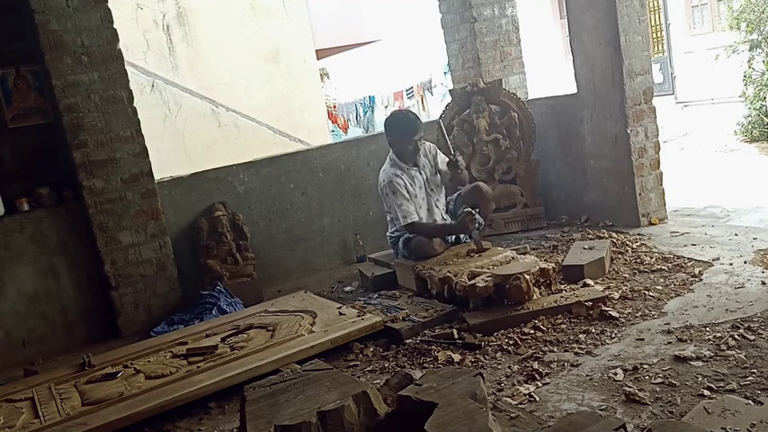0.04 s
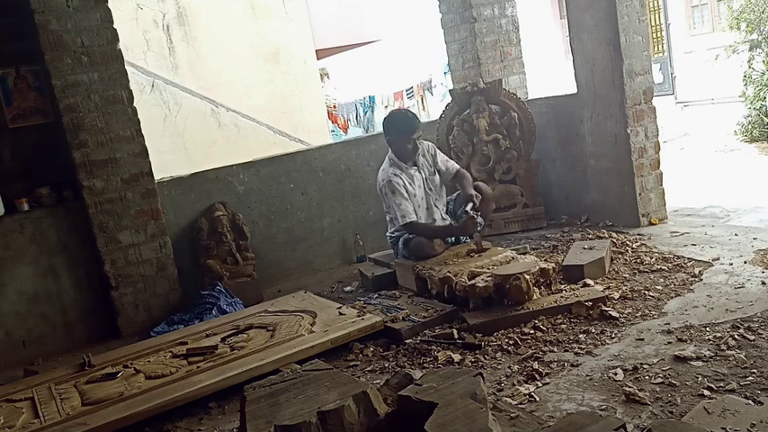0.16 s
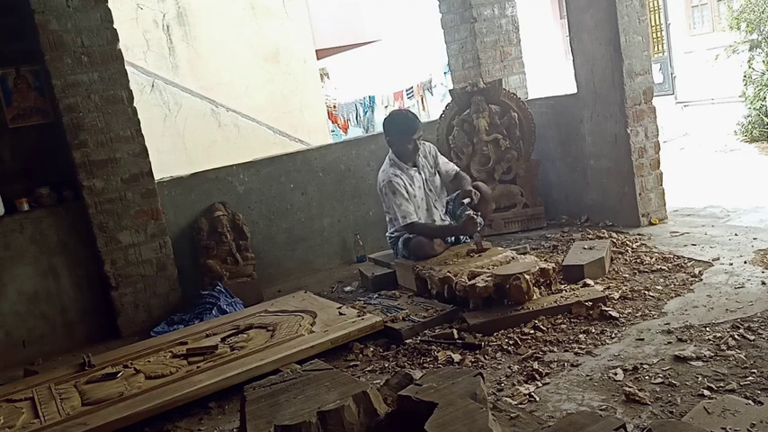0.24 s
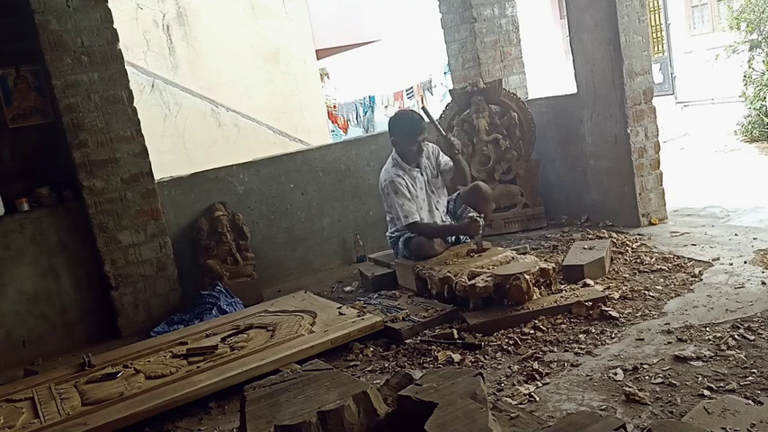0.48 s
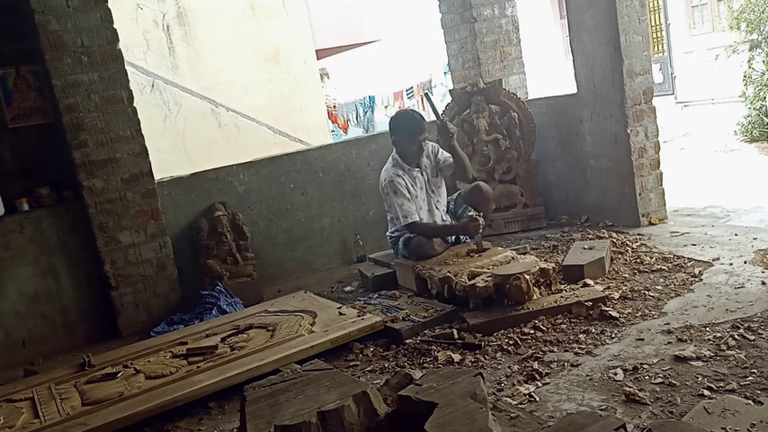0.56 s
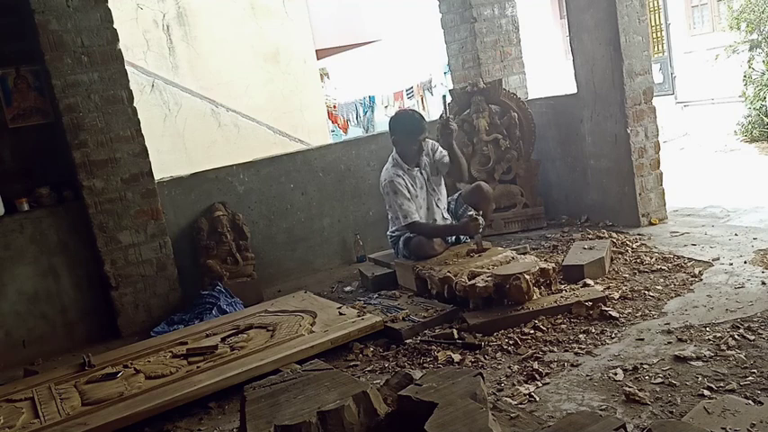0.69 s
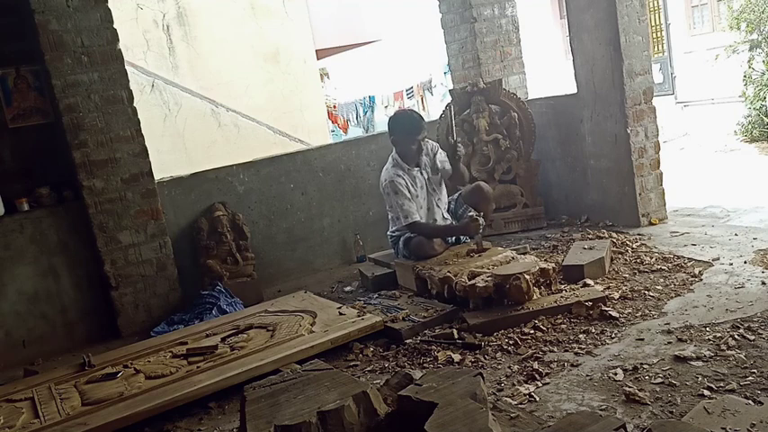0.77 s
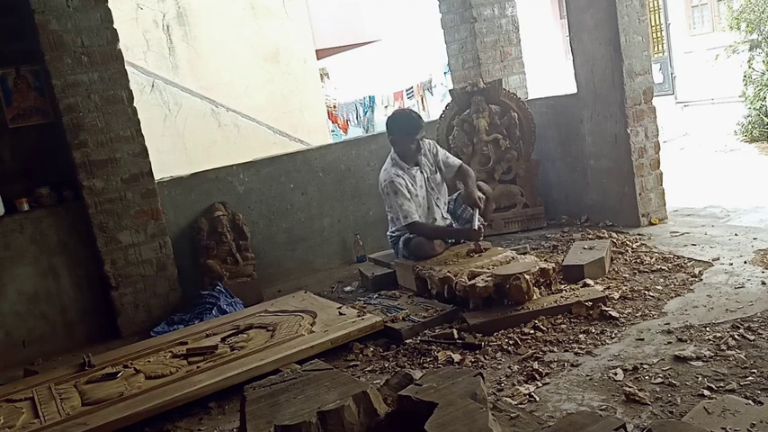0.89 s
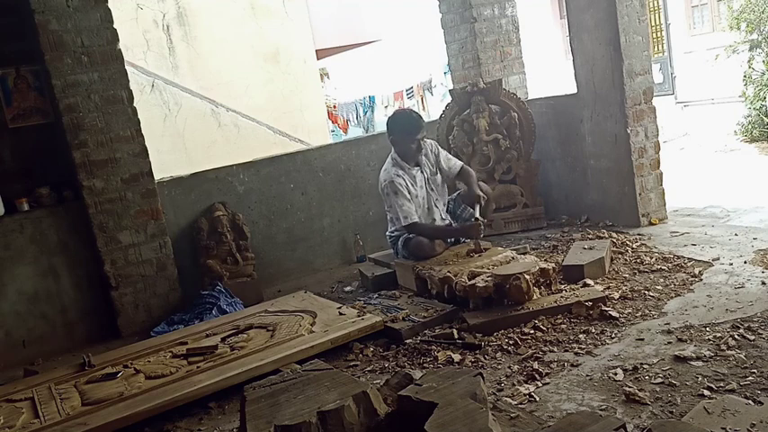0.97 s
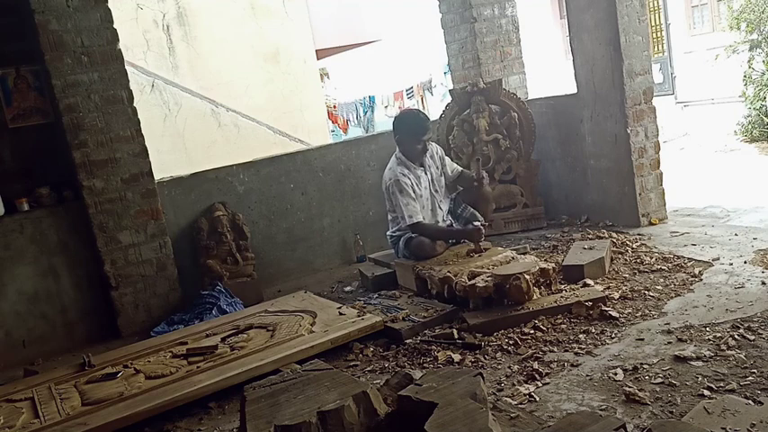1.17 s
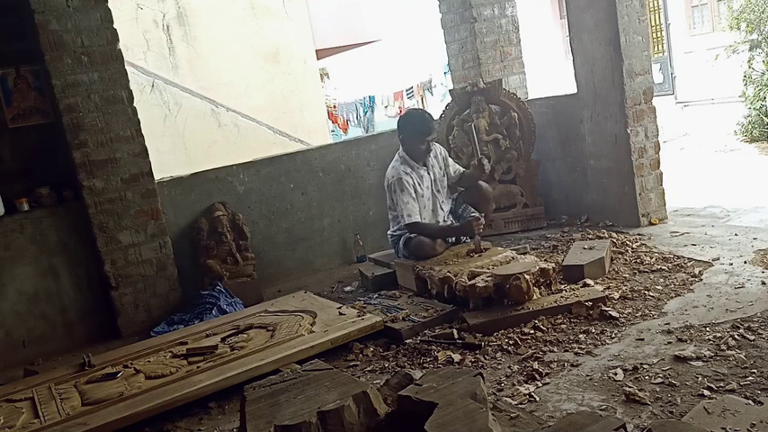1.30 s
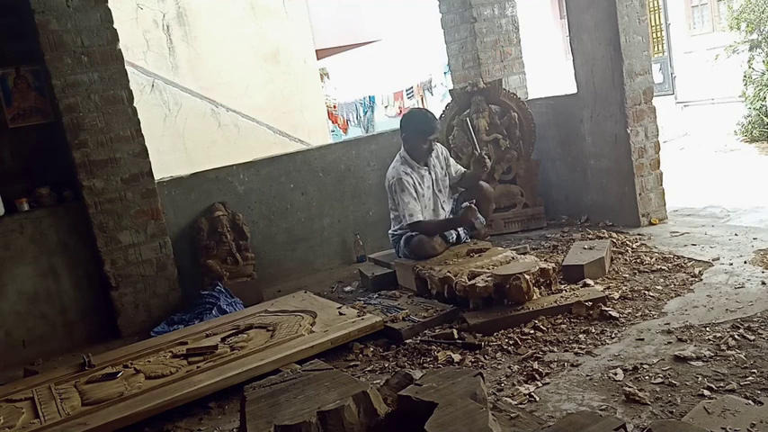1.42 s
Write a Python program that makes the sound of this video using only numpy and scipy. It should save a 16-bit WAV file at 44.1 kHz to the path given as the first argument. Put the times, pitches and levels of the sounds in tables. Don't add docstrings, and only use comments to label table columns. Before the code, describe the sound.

A mallet knocks a steel chisel into a thick wooden slab: a dull tap, then a fuller one, then one hard ringing blow. Open brick shed, heard from some metres away, with faint machine drone and street hiss.

```python
import sys
import numpy as np
from scipy import signal
from scipy.fft import rfft, irfft, next_fast_len
from scipy.io import wavfile
from scipy.ndimage import uniform_filter1d, map_coordinates

SR = 44100
rng = np.random.default_rng(int(sys.argv[2]) if len(sys.argv) > 2 else 0)


def magnitude_from_level(level_db):
    exponent = np.asarray(level_db, float) / 20
    return 10 ** exponent


def dump_mix(stems):
    frames = np.atleast_2d(stems).T
    limited = np.clip(frames, -1, 1)
    pcm = np.round(limited * 32767).astype(np.int16)
    wavfile.write(sys.argv[1], SR, pcm)


N = 63945

BLOW_LAG_S, TAP_LAG_S, STREET_LAG_S = .0001, -.00043, -.000363
RING_DIRECT_DB = 8


def unit(x):
    return x / np.sqrt(np.mean(x ** 2) + 1e-20)


def energy1(x):
    return x / np.linalg.norm(x)


def along(points, hz):
    f, v = np.transpose(points)
    return np.interp(np.log(hz + 1), np.log(f + 1), v)


def curve(rows):
    return np.interp(np.arange(N) / SR, *np.transpose(rows))


def wobble(rate):
    return map_coordinates(rng.standard_normal(200), [np.arange(N) * rate / SR])


def filtered(x, response):
    n = x.shape[-1]
    m = next_fast_len(n + SR // 4)
    return irfft(rfft(x, m) * response(np.fft.rfftfreq(m, 1 / SR)), m)[..., :n]


def causal(points, size=4096):
    level_db = np.maximum(along(points, np.fft.rfftfreq(size, 1 / SR)), -70)
    cepstrum = irfft(np.log(magnitude_from_level(level_db)), size)
    cepstrum[1:size // 2] *= 2
    cepstrum[size // 2 + 1:] = 0
    return irfft(np.exp(rfft(cepstrum)), size)


def ports(pair):
    # (frequency [Hz], left-right likeness [0-1])
    alike = [(130, 1), (240, .96), (600, .7), (1500, .4), (4000, .3), (15000, .2)]

    def mid_side(hz):
        turn = np.arccos(np.clip(along(alike, hz), -1, 1)) / 2
        return np.array([np.cos(turn), np.sin(turn)])

    mid, side = filtered(pair, mid_side)
    return np.array([mid + side, mid - side])


def placed(pair, s, lag_s, left_db=.7):
    port_s = s + lag_s * np.array([[.5], [-.5]])
    gain = magnitude_from_level(left_db * np.array([[1], [-1]]))
    return gain * filtered(pair, lambda hz: np.exp(-2j * np.pi * hz * port_s))


def rush(spectrum, patchy_db):
    z = signal.stft(rng.standard_normal((2, N)), nperseg=512)[2]
    patches = uniform_filter1d(rng.standard_normal(z.shape[1:]), 4, 0)
    patches = unit(uniform_filter1d(patches, 8, 1))
    pair = signal.istft(z * magnitude_from_level(patchy_db * patches), nperseg=512)[1][:, :N]
    return unit(filtered(ports(pair), lambda hz: magnitude_from_level(along(spectrum, hz))))


def machine():
    # (time [s], level [dB])
    load = [(0, -56.5), (.35, -58.5), (.6, -57), (.8, -58.5), (1.0, -58.5), (1.07, -64), (1.14, -58),
            (1.22, -55.5), (1.3, -55.5), (1.35, -59.5), (1.4, -59), (1.45, -57)]
    # (frequency [Hz], level [dB per Hz])
    drone = [(65, -48), (110, -21.5), (404, -5.5), (529, -7.5), (578, -5.5), (1200, -32), (1560, -64),
             (2640, -120)]
    # (frequency [Hz], rms level among the tones [dB], width [Hz])
    motor = [(377.5, -19.5, 6.7), (424.5, -13, 11), (599.5, -9, 14.6), (780, -16.5, 28), (882, -10, 26),
             (1247, -22, 4), (1963, -17, 18), (2510, -16.5, 23)]

    def lines(hz):
        return sum(magnitude_from_level(db) / np.sqrt(width) / (1 + ((hz - centre) / width) ** 2)
                   for centre, db, width in motor)

    tones = magnitude_from_level(2) * unit(filtered(ports(rng.standard_normal((2, N))), lines))
    body = magnitude_from_level(wobble(10.47)) * rush(drone, patchy_db=4.5)
    return placed(magnitude_from_level(curve(load)) * (body + tones), 0, STREET_LAG_S)


def street():
    # (time [s], level [dB])
    swell = [
        (0, -55.5),
        (.6, -57),
        (.85, -53.5),
        (1.05, -56),
        (1.45, -56),
    ]
    # (frequency [Hz], level [dB per Hz])
    hiss = [(600, -16), (950, -9), (1340, -8), (1980, -3), (2500, -4), (3100, -14), (5700, -16.5),
            (7000, -25.5)]
    level = magnitude_from_level(curve(swell) + .8 * wobble(15))
    return placed(level * rush(hiss, patchy_db=1), 0, STREET_LAG_S)


def wind():
    # (time [s], level [dB])
    gusts = [(0, -52.5), (.1, -65.5), (.2, -70.5), (.3, -61), (.4, -68), (.55, -49.5), (.62, -61),
             (.7, -61.5), (.78, -58), (1.0, -70), (1.45, -67.5)]
    # (frequency [Hz], level [dB per Hz])
    rumble = [(25, -45), (36, -20), (50, 0), (64, -8), (82, -3), (105, -10), (140, -32)]
    return magnitude_from_level(curve(gusts)) * rush(rumble, patchy_db=0)


def crack(tone):
    return energy1(causal(tone))


def ring(modes, rise_cycles=4.5):
    t = np.arange(SR // 2) / SR
    total = 0
    for k, (hz, db, t60) in enumerate(modes):
        swing = (1 - np.exp(-t * hz / rise_cycles)) * np.sin(2 * np.pi * hz * t)
        total = total + (-1) ** k * magnitude_from_level(db - 60 * t / t60) * swing
    return energy1(total)


def heard(x, db, rise_s, direct_db=-20):
    # (frequency [Hz], t60 [s])
    shed = [(100, 0.22), (300, 0.35), (1000, 0.32), (3000, 0.31), (5000, 0.25), (7000, 0.24), (14000, 0.13)]
    hz, t, z = signal.stft(rng.standard_normal((2, SR)), SR, nperseg=256)
    decay = magnitude_from_level(-60 * t / along(shed, hz)[:, None])
    tail = ports(signal.istft(z * decay, SR, nperseg=256)[1][:, :SR])
    tail = tail * (1 - np.exp(-np.arange(SR) / SR / abs(rise_s)))
    tail = tail / np.linalg.norm(tail[0])
    tail[:, :1] += magnitude_from_level(direct_db)
    wet = signal.fftconvolve(x[None], tail, axes=1)
    return magnitude_from_level(db + 30) * np.pad(wet, ((0, 0), (0, N)))[:, :N]


def taps():
    # (time [s], level [dB], wall rise [s], slab ring over the crack [dB])
    knocks = [
        (-.02, -39, 0.0076, -19),
        (0.2076, -37.5, 0.0071, -1),
    ]
    # (frequency [Hz], level [dB per Hz])
    tone = [(130, -43), (220, -3), (450, -7), (1000, 0), (2000, -7), (2700, -16), (3300, -30),
            (6000, -34.5)]
    # (frequency [Hz], level [dB], t60 [s])
    slab_low = [(242, 0, .17), (297, -3, .14), (406, -1, .13), (900, -7, .13), (1130, -9, .09),
                (1310, -9, .12)]
    out = 0
    for s, db, rise_s, slab_db in knocks:
        slab = heard(ring(slab_low), db + slab_db - RING_DIRECT_DB, rise_s, RING_DIRECT_DB)
        out = out + placed(heard(crack(tone), db, rise_s) + slab, s, TAP_LAG_S)
    return out


def blow():
    # (frequency [Hz], level [dB per Hz])
    tone = [(130, -27.5), (230, -2), (650, -8), (1450, -4), (3000, -0.5), (4200, -5), (5500, 1.5),
            (7000, -12.5)]
    # (frequency [Hz], level [dB], t60 [s])
    slab = [(246, 0, .16), (322, -1, .14), (405, -3, .12), (537, -5, .14), (795, -2, .1), (1150, -6, .09),
            (1388, -2, .13), (1505, -4, .11), (1765, -8, .13), (2196, -4, .16), (2585, -6, .12),
            (2715, -7, .12)]
    # (frequency [Hz], level [dB], t60 [s])
    blade = [(4956, -9, .12), (5100, -7, .16), (5350, -10, .18), (5720, -4, .09), (6234, -10, .1),
             (8107, -11, .1)]
    # (frequency [Hz], level [dB], t60 [s])
    long_note = [(3681, 0, .27), (3706, -3, .24), (3780, -7, .08), (3674.8, -7, .42)]
    # (frequency [Hz], level [dB], t60 [s])
    floor = [(52, -56, .5), (82, -48, .25)]
    db, rise_s = -20.5, .0035
    slab_db, note_db, note_direct_db = -4, -24, 14
    thud_rise_s = .021

    hit = heard(crack(tone), db, rise_s)
    body = heard(ring(slab + blade), db + slab_db - RING_DIRECT_DB, rise_s, RING_DIRECT_DB)
    note = heard(ring(long_note, rise_cycles=10), note_db - note_direct_db, rise_s, note_direct_db)
    t = np.arange(N) / SR
    thud = sum(magnitude_from_level(mode_db - 60 * t / t60) * np.sin(2 * np.pi * hz * t) for hz, mode_db, t60 in floor)
    thud = (1 - np.exp(-t / thud_rise_s)) * thud
    return placed(hit + body + note + thud, .3902, BLOW_LAG_S, left_db=-.2)


def chip():
    # (frequency [Hz], level [dB per Hz])
    tone = [(2500, -30), (4000, 0), (7000, -2), (15000, 2)]
    return placed(heard(crack(tone), db=-53, rise_s=.001), 1.043, BLOW_LAG_S)


def scene():
    return machine() + street() + wind() + taps() + blow() + chip()


def roll_off(x):
    return signal.sosfilt(signal.butter(12, 16710, fs=SR, output="sos"), x)


def record(dry):
    # (frequency [Hz], level [dB])
    mic = [(6800, 2), (7600, -7), (8300, -15), (12000, -16), (13600, -10), (14800, -10), (15500, -38),
           (16600, -25)]
    mix = signal.fftconvolve(dry, causal(mic)[None], axes=1)[:, :N]
    return roll_off(mix)


dry = scene()
out = record(dry)
dump_mix(out)
```